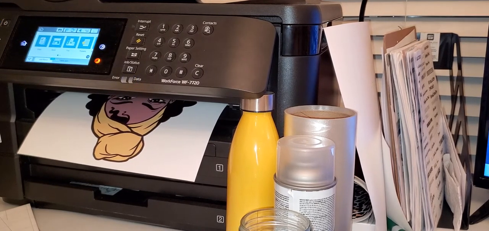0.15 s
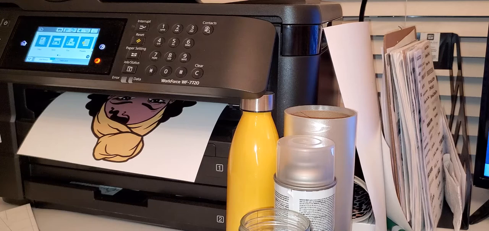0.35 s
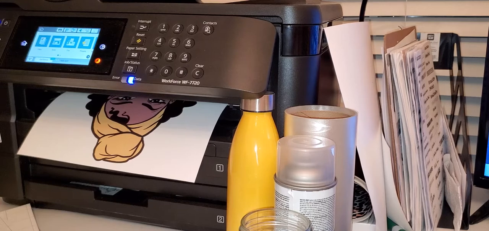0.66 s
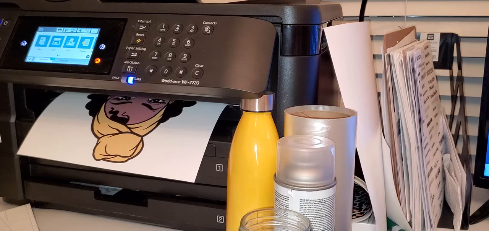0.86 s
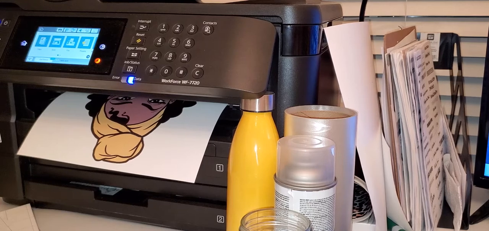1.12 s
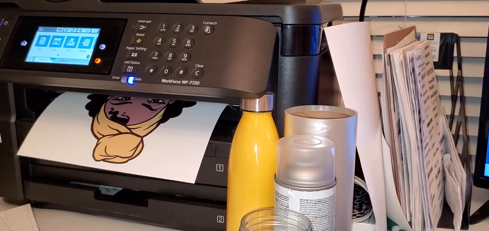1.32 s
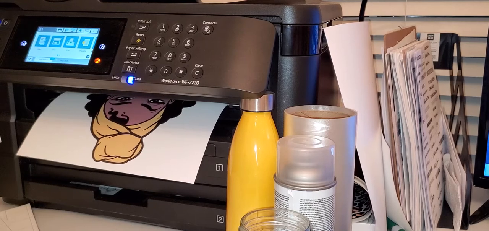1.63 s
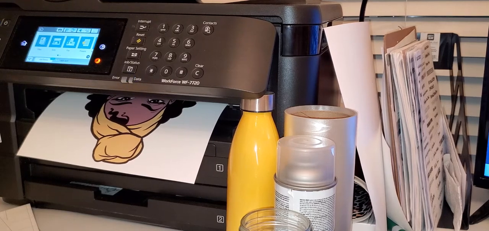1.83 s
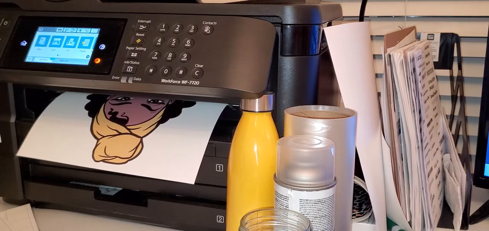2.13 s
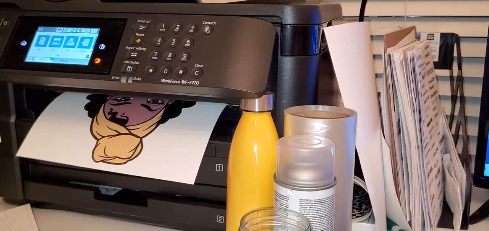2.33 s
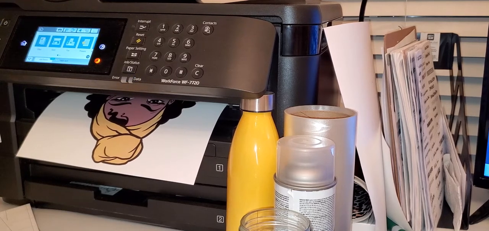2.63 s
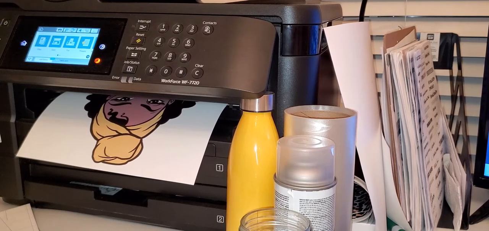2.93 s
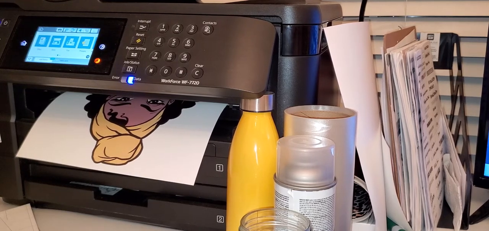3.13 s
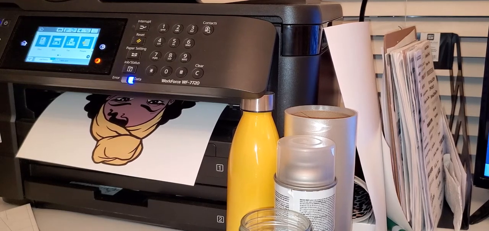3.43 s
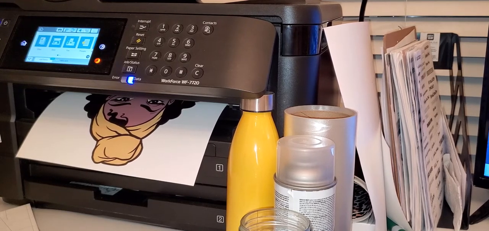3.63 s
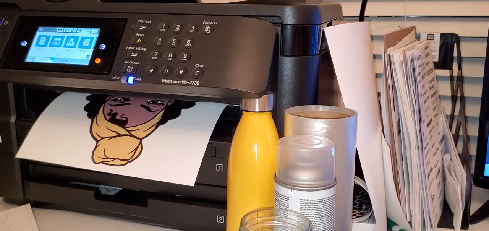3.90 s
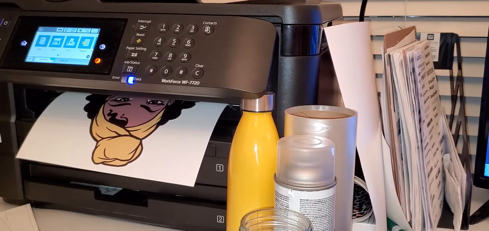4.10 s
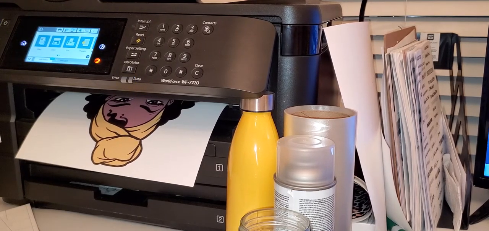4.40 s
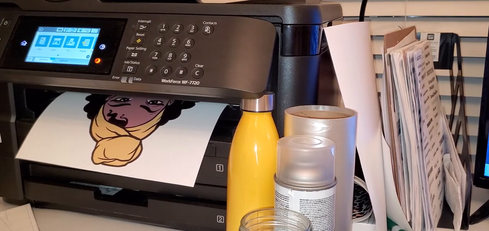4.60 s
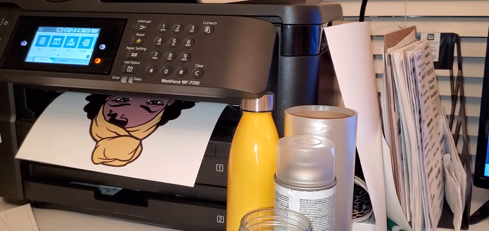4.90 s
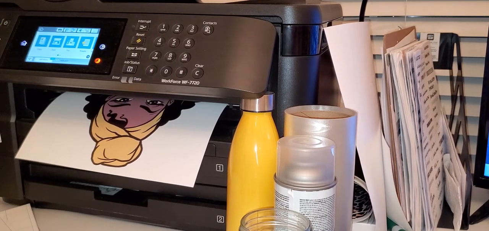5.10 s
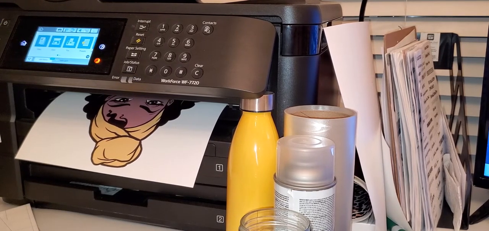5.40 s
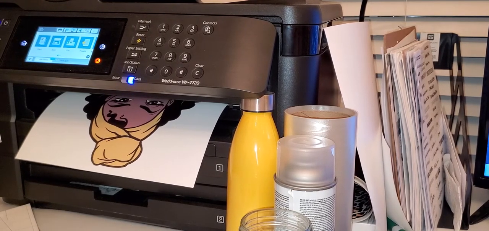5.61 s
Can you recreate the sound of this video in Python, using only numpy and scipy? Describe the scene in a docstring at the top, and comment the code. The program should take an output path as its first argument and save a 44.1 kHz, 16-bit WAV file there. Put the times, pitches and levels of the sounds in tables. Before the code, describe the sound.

An inkjet printer close by shuttles its carriage back and forth, knocking and ticking nearly three times a second, with handling rumble and one deep thud.

```python
"""A small room, an inkjet printer close by on the left, heard through a hand-held camera's two microphone ports.
From the start the air is still, the grip rumbles and the carriage hisses (shaped noise) along its rail, with
drive tones; at each turn, nearly three a second, knocks (noise bursts, damped modes), ticks and a shudder.
Around 1.4 s something rubs the left port; near 2.2 s a double bump makes one deep thud in the camera body.
Near 4.9 s the carriage slows almost to a halt between two clacks, then runs on to a last turn at 5.45 s."""
import sys
import numpy as np
from scipy import signal
from scipy.fft import rfft, irfft
from scipy.io import wavfile

SR = 44100
rng = np.random.default_rng(int(sys.argv[2]) if len(sys.argv) > 2 else 0)


def master_out(mix):
    """Clip the mix to full scale and print it as 16-bit PCM to the path in sys.argv[1]."""
    frames = np.transpose(np.atleast_2d(mix))
    ceiling = np.clip(frames, -1, 1)
    pcm = np.round(ceiling * 32767).astype(np.int16)
    wavfile.write(sys.argv[1], SR, pcm)


N = 253575
TIME = np.arange(N) / SR
AGE = np.arange(SR // 2) / SR  # s since a blow
LEFT_LEAD = 0.00013  # s: the printer stands to the left

# In all tables of blows the levels are set before the small trims in the code.
# Turns at the first end of the rail: [t/s, knock level/dB, frame shudder level/dB, plastic rattle level/dB]
FIRST_END_TURNS = [(0.237, -45, -46.5, -50.5), (0.9336, -45, -47.5, -52.5), (1.6303, -44, -48.5, -52.5),
                   (2.327, -47, -52, -57.5), (3.0214, -45.5, -49, -51.5), (3.7148, -46.5, -47.5, -49.5),
                   (4.4051, -45, -47.5, -52), (5.4498, -44.5, -48, -55)]
# Turns at the other end: [t/s, knock level/dB, frame shudder level/dB, belt take-up knock level/dB,
# hollow boom level/dB, plastic tick level/dB]
OTHER_END_TURNS = [(0.5837, -47.5, -48.5, -47.5, -43, -68), (1.2797, -48, -49, -56, -48.5, -68),
                   (1.9759, -48.5, -48.5, -51, -43, -61), (2.672, -49.5, -52.5, -55, -44.5, -66),
                   (3.3677, -47.5, -48, -54, -47.5, -62), (4.059, -47, -50, -49.5, -41.5, -52.5)]
# Colour of the shaking frame: [f/Hz, relative level/dB per Hz]
SHUDDER_COLOUR = [(60, 6.5), (110, 4.5), (150, -6.5), (210, 8), (290, -9.5), (380, 5.5), (500, -10),
                  (680, -2), (950, -11), (1500, -16), (3000, -22.5), (6000, -46), (15500, -57.5)]
# Modes of the frame: [f/Hz, level/dB, t60/s]
FRAME_RING = [(343, -6, 0.52), (382.6, -1, 0.27), (483.5, -1.5, 0.25), (594, -8.5, 0.24), (625, -3, 0.32),
              (779, -7, 0.14)]
# Modes of the hollow body: [f/Hz, level/dB, t60/s]
HOLLOW_RING = [(192.5, 5.5, 0.34), (182, -18, 0.15), (215.5, -13, 0.35)]


def gain_of(db):
    """Decibels to amplitude."""
    return 10 ** (np.asarray(db) / 20)


def evened(x):
    """Scales to rms 1."""
    return x / np.sqrt(np.mean(x ** 2) + 1e-20)


def read(points, hz):
    """Reads a table on a log-frequency axis."""
    f, value = np.transpose(points)
    return np.interp(np.log(hz + 1), np.log(f), value)


def add(mix, s, sound):
    """Mixes a sound in at time s."""
    part = mix[..., max(round(s * SR), 0):][..., :sound.shape[-1]]
    part += sound[..., :part.shape[-1]]


def wander(rate_hz, size=N):
    """Slow random motion of rms 1."""
    knots = np.arange(0, size, 32)
    hz = np.fft.rfftfreq(len(knots), knots[1] / SR)
    spectrum = rfft(rng.standard_normal(len(knots))) * np.exp(-(hz / rate_hz) ** 2)
    slow = irfft(spectrum, len(knots))
    return np.interp(np.arange(size), knots, evened(slow))


def noise(colour, size):
    """Coloured noise at the two microphone ports, which agree in the bass more than in the treble."""
    # Likeness of the two ports: [f/Hz, coherence]
    coherence = [(20, 0.91), (120, 0.95), (250, 0.99), (500, 0.91), (1000, 0.43), (2200, 0.4),
                 (4000, 0.067), (8000, 0.17), (15500, 0.069)]
    # Balance of the ports: [f/Hz, left minus right level/dB]
    balance = [(20, -0.5), (500, 0.9), (1000, 1.5), (2500, 2), (6000, 2), (13000, 2.5)]
    hz = np.fft.rfftfreq(size, 1 / SR)
    left, other = rfft(rng.standard_normal((2, size)))
    same = np.clip(read(coherence, hz), -1, 1)
    lean = gain_of(read(balance, hz) / 2)
    late_left = left * np.exp(-2j * np.pi * hz * LEFT_LEAD)
    right = same * late_left + np.sqrt(1 - same ** 2) * other
    ports = np.array([left * lean, right / lean])
    return evened(irfft(ports * gain_of(read(colour, hz)), size))


def burst(colour, rise, t60, chatter_db=0):
    """A blow on a part with many crowded modes: noise swells and dies; chatter breaks it into small impacts."""
    shape = (1 - np.exp(-(AGE / rise) ** 2)) * gain_of(-60 * AGE / t60)
    contacts = evened(gain_of(chatter_db * np.clip(wander(270, len(AGE)), -2, 2)))
    sound = noise(colour, len(AGE)) * shape * contacts
    # the level belongs to the peak of the swell, whatever its length
    return evened(sound) * np.sqrt(np.mean(shape ** 2)) / shape.max()


def ring(modes, rise, spread=0):
    """Damped modes after a soft or hard blow; spread (radians) scatters their phase at each port."""
    hz, db, t60 = np.transpose(modes)[:, :, None]
    phase = spread * rng.standard_normal((2, len(modes), 1))
    phase[1] -= 2 * np.pi * hz * LEFT_LEAD
    partials = gain_of(db - 60 * AGE / t60) * np.sin(2 * np.pi * hz * AGE + phase)
    return partials.sum(1) * (1 - np.exp(-(AGE / rise) ** 2))


def tone(hz, width_hz):
    """A line wavering in pitch and level that reaches the left port first."""
    phase = 2 * np.pi * np.cumsum(hz + width_hz / 2 * wander(width_hz)) / SR
    ports = np.sin([phase, phase - 2 * np.pi * hz * LEFT_LEAD])
    return np.sqrt(2) * ports * gain_of(2.4 * wander(20.5))


def alike(rows, colour, rise, t60):
    """One chattering burst a row; the same part is struck each time, so some of its ring repeats."""
    own, *fresh = [burst(colour, rise, t60, chatter_db=0.4) for _ in range(len(rows) + 1)]
    return [(own + 2 * one) / np.hypot(1, 2) for one in fresh]


def still_air():
    """The still air of the place: steady noise that falls off towards the treble."""
    # Colour of the air: [f/Hz, relative level/dB per Hz]
    air_colour = [(20, -0.5), (120, -6.5), (250, -12.5), (500, -11), (800, -16.5), (1500, -18),
                  (3000, -23.5), (6000, -32.5), (15500, -42.5)]
    return gain_of(-59.5) * noise(air_colour, N)


def room(x):
    """A diffuse tail whose treble dies first, apart from a shorter decay in the lowest bass."""
    # Decay of the room: [f/Hz, t60/s]
    room_decay = [(100, 0.14), (500, 0.41), (2000, 0.31), (6000, 0.26), (14000, 0.21)]
    hz, t, z = signal.stft(rng.standard_normal((2, len(AGE))), SR, nperseg=256)
    fading = z * gain_of(-60 * t / read(room_decay, hz)[:, None])
    tail = signal.istft(fading, SR, nperseg=256)[1][:, :len(AGE)]
    tail = tail * (1 - np.exp(-(AGE / 0.012) ** 2))
    return signal.fftconvolve(x, tail / np.linalg.norm(tail[0]), axes=1)[:, :N]


def grip_rumble():
    """Low noise through the camera body that swells and settles as the hand shifts its grip."""
    # Colour of the rumble: [f/Hz, relative level/dB per Hz]
    rumble_colour = [(10, -4), (30, -1), (45, 0.5), (65, 3.5), (90, 0), (130, -9), (200, -46), (500, -50),
                     (2000, -88)]
    # Shifts of the grip: [t/s, level/dB, settling time constant/s]
    shifts = [(.7, -52, 0.14), (.9, -45.5, 0.21), (1.72, -46.5, 0.15), (2.25, -40.5, 0.16),
              (3.53, -63, .15), (3.87, -51, 0.083)]
    rise_s, steady_hand_db = .04, -59.5
    grip = gain_of(steady_hand_db)
    for s, db, settle in shifts:
        swell = np.exp(-np.maximum((s - TIME) / rise_s, (TIME - s) / settle))
        grip = np.hypot(grip, gain_of(db) * swell)
    return noise(rumble_colour, N) * grip


def left_port_rubs():
    """A finger rests on the left microphone port for a while, and brushes across the body rub there."""
    # Colour of the rubbing: [f/Hz, relative level/dB per Hz]
    rub_colour = [(15, -18), (40, 6), (75, 11), (120, -3.5), (170, -26), (300, -41), (2000, -80)]
    # Brushes across the camera body: [t/s, level/dB]
    brushes = [(1.027, -41), (1.136, -35), (1.224, -32), (1.26, -33.5), (1.394, -34.5), (1.534, -32.5),
               (1.57, -32.5), (1.658, -34)]
    touch_mid_s, touch_half_s, touch_db = 1.37, 0.63, -48
    out = np.zeros((2, N))
    touch = np.exp(-((TIME - touch_mid_s) / touch_half_s) ** 4)
    out[0] += gain_of(touch_db) * touch * noise(rub_colour, N)[0]
    for s, db in brushes:
        add(out[0], s, gain_of(db) * burst(rub_colour, rise=0.007, t60=.13)[0])
    return out


def body_bumps():
    """Sways and bumps ring the low modes of the camera body; each bump brings a soft rustle of skin."""
    # Sways of the camera body: [t/s, level/dB]
    sways = [(1.664, -35.5), (3.483, -37), (3.534, -43), (5.68, -45)]
    # Modes of the sway: [f/Hz, level/dB, t60/s]
    sway_ring = [(32.4, -9, .4), (58, -0.5, 0.35)]
    # Bumps on the camera body: [t/s, level/dB]
    bumps = [(2.1745, -1.5), (2.2081, -6.5)]
    # Modes of the bumped body: [f/Hz, level/dB, t60/s]
    body_ring = [(61.7, -2.5, 0.12), (81.3, -10.5, 0.28), (90.3, 0.5, 0.137), (102.6, -1, 0.14),
                 (115, -21.5, 0.23)]
    # Colour of skin on the camera: [f/Hz, relative level/dB per Hz]
    skin_colour = [(300, -23), (1500, -16), (2400, 4), (3500, 2), (5000, -5), (7000, -20), (15500, -32)]
    out = np.zeros((2, N))
    for s, db in sways:
        add(out, s, gain_of(db) * ring(sway_ring, rise=0.0061))
    for s, db in bumps:
        add(out, s, gain_of(db) * ring(body_ring, rise=0.022))
        add(out, s, gain_of(db - 57) * burst(skin_colour, rise=0.014, t60=0.16, chatter_db=3))
    return out


def carriage():
    """Rail hiss, drive tones, belt and whistle follow the speed, which drops to zero just ahead of each knock."""
    # Share of full speed around the near halt: [t/s, share]
    slowing = [(4.8, 1), (4.87, 0.27), (4.97, 0.12), (5.05, 1)]
    # Colour of the slider on the rail: [f/Hz, relative level/dB per Hz]
    rail_colour = [(100, -1.5), (200, 4.5), (500, -10.5), (820, -2), (1100, -11.5), (2000, -20.5),
                   (3200, -16), (4500, -21.5), (5500, -21.5), (7000, -26.5), (10000, -25.5), (15500, -26.5)]
    # Tones of the running drive: [f/Hz, level/dB, width/Hz]
    drive_lines = [(259, -66.5, 5.17), (400, -81.5, 20.1), (510, -75.5, 21.1), (767, -73.5, 27.8),
                   (826, -71.5, 25), (1175, -80, 14.1), (1558, -79.5, 60.4), (3170, -80, 46),
                   (4005, -87, 40), (5570, -85, 160)]
    ramp_s, stop_lead_s = 0.054, 0.0048  # time to stop or reach full speed; lead of the stop on the knock
    belt_hz, belt_db, belt_back_db = 2402, -77, -74
    belt_lag_s, belt_half_s = 0.2, 0.053  # swell on the way back, after a turn at the other end

    times = np.sort([row[0] for row in FIRST_END_TURNS + OTHER_END_TURNS])
    to_turn = abs(TIME[:, None] - times + stop_lead_s).min(1)
    speed = np.clip(to_turn / ramp_s, 0, 1) * np.interp(TIME, *np.transpose(slowing))

    grit = gain_of(1.34 * wander(4.4) + 1.5 * wander(210))  # the slider catches on the rail
    hiss = gain_of(-61.5) * noise(rail_colour, N) * grit
    drive = sum(gain_of(db) * tone(hz, width) for hz, db, width in drive_lines)

    # the belt teeth sing roughly, most of all around the middle of the way back
    way_back = sum(np.exp(-((TIME - row[0] - belt_lag_s) / belt_half_s) ** 4) for row in OTHER_END_TURNS)
    teeth = tone(belt_hz, 44) * evened(gain_of(2.7 * wander(90)))
    belt = (gain_of(belt_back_db) * way_back + gain_of(belt_db)) * teeth

    # the motor driver whistles with a side tone above and below; a lower whistle swells while it brakes
    side_tones = tone(14368, 30) + tone(14766, 30)
    switching = tone(14567, 16) + gain_of(-5) * side_tones
    brake_swell = np.exp(-((TIME[:, None] - times + .034) / .016) ** 2).sum(1)
    braking = gain_of(-83) * brake_swell * tone(13129, 12)
    return speed * (hiss + drive + belt + gain_of(-91.0) * switching) + braking


def tap():
    """The drive train takes up its slack: a chattering burst over a short ring."""
    # Colour of the tap: [f/Hz, relative level/dB per Hz]
    tap_colour = [(400, 8), (1500, -6), (2100, -1.5), (2650, 0), (3400, -10.5), (6000, -21), (15500, -44)]
    # Modes of the drive train: [f/Hz, level/dB, t60/s]
    train_ring = [(2040, -2, .03), (2510, 1, 0.036), (2620, -5, 0.06), (3020, -8.5, 0.038)]
    contact = gain_of(-53) * burst(tap_colour, rise=.0025, t60=0.055, chatter_db=1.5)
    return contact + gain_of(-62) * ring(train_ring, rise=0.0034, spread=2.5)


def tick():
    """A loose plastic part strikes the carriage: a very short, bright, chattering burst."""
    # Colour of the tick: [f/Hz, relative level/dB per Hz]
    tick_colour = [(500, 1.5), (2500, -1), (4500, -6), (6000, -9), (7500, -9), (10000, -1.5), (12000, -16),
                   (15500, -8)]
    return burst(tick_colour, rise=0.0017, t60=0.034, chatter_db=1.5)


def clacks():
    """Two hard blows crack through the plastic case and set its hollow body ringing."""
    # Clacks around the near halt: [t/s, rise/s, crack level/dB, case ring level/dB,
    # frame shudder level/dB, hollow boom level/dB]
    blows = [(4.8562, 0.0044, -35.5, -46.5, -52, -62), (4.9834, 0.0061, -41.5, -49, -42.5, -41)]
    # Colour of the crack: [f/Hz, relative level/dB per Hz]
    crack_colour = [(100, -19), (300, -11), (560, 3.5), (720, 3), (900, 0), (1150, 0), (1900, -2.5),
                    (2400, -11.5), (4200, -19.5), (7000, -31.5), (15500, -41)]
    # Modes of the case: [f/Hz, level/dB, t60/s]
    case_ring = [(384, -16, 0.24), (552, 0.5, 0.32), (732, 0, 0.25), (900, 10, 0.096), (1070, -12, 0.17),
                 (1513, -6, 0.18), (1660, 3, 0.14), (1954, -10, 0.063), (2100, -15, .1), (4100, -13, .08)]
    out = np.zeros((2, N))
    for s, rise, crack_db, case_db, shudder_db, boom_db in blows:
        add(out, s, gain_of(crack_db + 1.5) * burst(crack_colour, rise, t60=0.091))
        add(out, s, gain_of(case_db) * ring(case_ring, rise, spread=0.51))
        add(out, s, gain_of(shudder_db) * burst(SHUDDER_COLOUR, rise=0.012, t60=0.2))
        add(out, s, gain_of(shudder_db - 1.5) * ring(FRAME_RING, rise=0.0074, spread=.5))
        add(out, s, gain_of(boom_db) * ring(HOLLOW_RING, rise=0.024))
    add(out, 4.5, gain_of(3) * tap())  # a stronger tap, well before the first clack
    add(out, 4.981, gain_of(-56) * tick())  # a tick just before the second
    return out


def braking_and_frame():
    """The motor brakes before every turn, with a tap and a shudder; the frame rings just after the turn."""
    brake_lead_s = .0395
    out = np.zeros((2, N))
    for s, _, shudder_db, *_ in FIRST_END_TURNS + OTHER_END_TURNS:
        add(out, s - brake_lead_s, tap())
        add(out, s - brake_lead_s, gain_of(-52.5) * burst(SHUDDER_COLOUR, rise=0.029, t60=0.34))
        add(out, s + 0.01006, gain_of(shudder_db - 2.5) * ring(FRAME_RING, rise=0.019, spread=0.46))
    return out


def first_end_knocks():
    """The carriage knocks as it reverses; the frame shudders, and loose plastic strikes and bounces once."""
    # Colour of the knock: [f/Hz, relative level/dB per Hz]
    knock_colour = [(150, -19), (380, 5), (520, 0), (780, 3.5), (1200, -9), (1750, -18.5), (2500, -2),
                    (3400, -11.5), (4300, -12.5), (5500, -14.5), (7500, -22.5), (10000, -19), (15500, -32)]
    # Modes of the carriage: [f/Hz, level/dB, t60/s]
    carriage_ring = [(2070, -0.5, 0.042), (2550, 3, 0.051), (3014, -10.5, 0.049), (3368, 2, 0.047),
                     (4580, -9, .03), (5450, -1, 0.043)]
    rattle_lag_s, bounce_s = .0178, .009
    out = np.zeros((2, N))
    knocks = alike(FIRST_END_TURNS, knock_colour, rise=0.0023, t60=0.067)
    for (s, knock_db, shudder_db, rattle_db), knock in zip(FIRST_END_TURNS, knocks):
        add(out, s, gain_of(knock_db) * knock)
        add(out, s, gain_of(knock_db - 4.0) * ring(carriage_ring, rise=0.0017, spread=1.87))
        add(out, s + .011, gain_of(shudder_db + 1.5) * burst(SHUDDER_COLOUR, rise=0.013, t60=0.32))
        add(out, s + rattle_lag_s, gain_of(rattle_db) * tick())
        add(out, s + rattle_lag_s + bounce_s, gain_of(rattle_db + 1.6) * tick())
    return out


def other_end_knocks():
    """Loose plastic tips over, the carriage knocks and the pulley rings; the body booms, the belt takes up."""
    # Colour of the knock: [f/Hz, relative level/dB per Hz]
    knock_colour = [(150, -12), (400, 9), (800, -4), (1300, -8), (2200, -4.5), (3700, -6.5), (5000, -12),
                    (7000, -17), (9500, -15), (12000, -30), (15500, -28)]
    # Colour of the second knock, as the belt takes up: [f/Hz, relative level/dB per Hz]
    take_up_colour = [(150, -30), (700, 20.5), (1200, -2), (2400, 7), (3500, -3.5), (6000, -13),
                      (15500, -44)]
    # Modes of the pulley: [f/Hz, level/dB, t60/s]
    pulley_ring = [(2176, -2, 0.044), (2900, -9, 0.044), (3605, -1.5, 0.064)]
    tip_lead_s = .0215
    out = np.zeros((2, N))
    knocks = alike(OTHER_END_TURNS, knock_colour, rise=0.0025, t60=0.097)
    for (s, knock_db, shudder_db, take_up_db, boom_db, tick_db), knock in zip(OTHER_END_TURNS, knocks):
        add(out, s - tip_lead_s, gain_of(tick_db) * tick())
        add(out, s, gain_of(knock_db) * knock)
        add(out, s, gain_of(knock_db - 3.5) * ring(pulley_ring, rise=0.0016, spread=1.8))
        add(out, s + .012, gain_of(shudder_db + 1.0) * burst(SHUDDER_COLOUR, rise=0.0064, t60=0.28))
        add(out, s + 0.01793, gain_of(boom_db) * ring(HOLLOW_RING, rise=0.016))
        add(out, s + 0.022, gain_of(take_up_db) * burst(take_up_colour, rise=0.0041, t60=0.11))
    return out


def scene():
    """Still air, the hand on the camera, the running carriage, and the blows with their room tail."""
    handling = grip_rumble() + left_port_rubs() + body_bumps()
    turns = braking_and_frame() + first_end_knocks() + other_end_knocks()
    blows = clacks() + turns
    return still_air() + handling + carriage() + gain_of(-13) * room(blows) + blows


def record(dry):
    """The recorder's band limit: a steep low-pass."""
    edge_hz = 15850
    low_pass = signal.firwin(511, edge_hz, window=("kaiser", 9), fs=SR)
    return signal.oaconvolve(dry, low_pass[None], "same", axes=1)


dry = scene()
out = record(dry)
master_out(out)
```